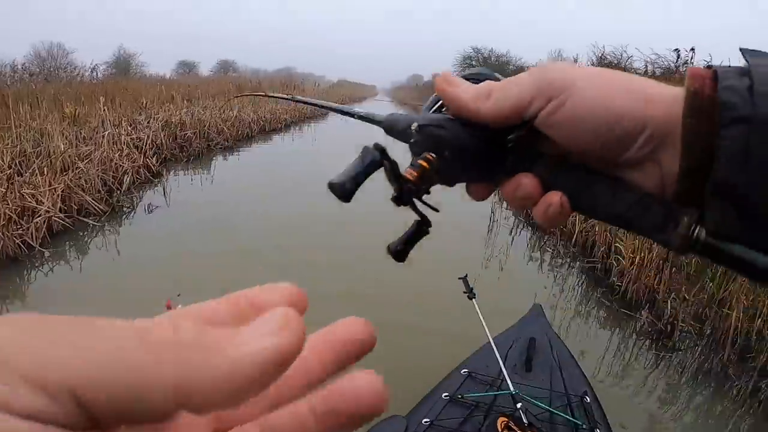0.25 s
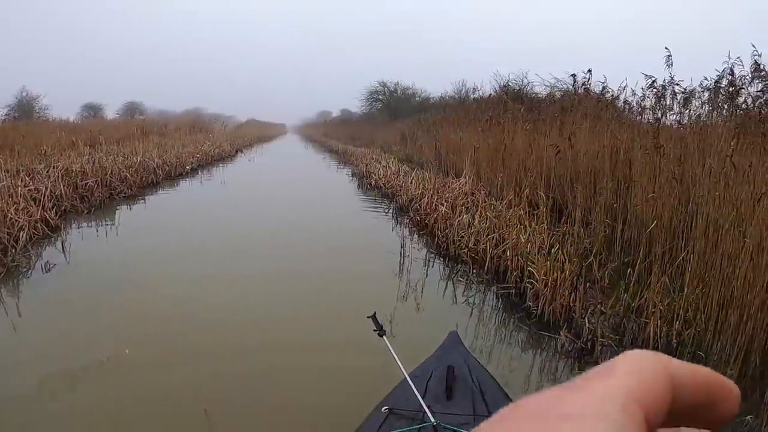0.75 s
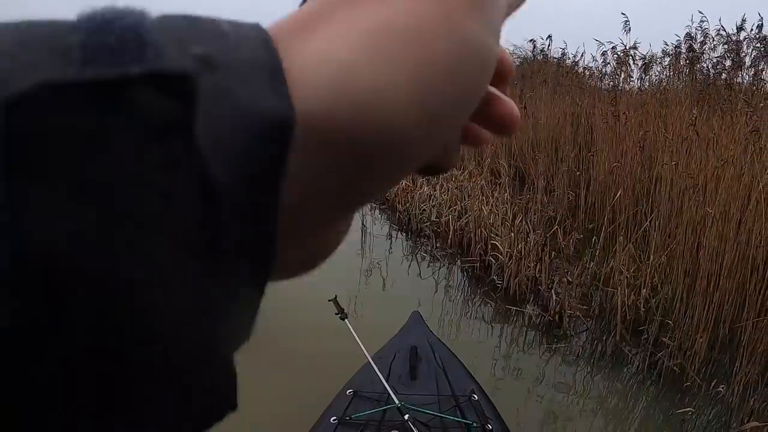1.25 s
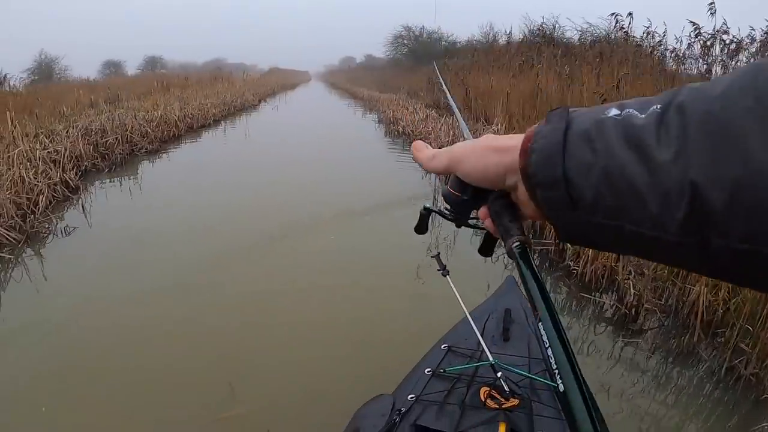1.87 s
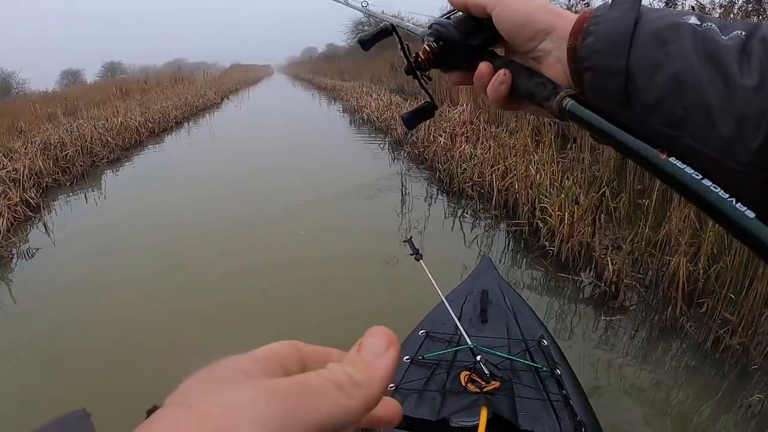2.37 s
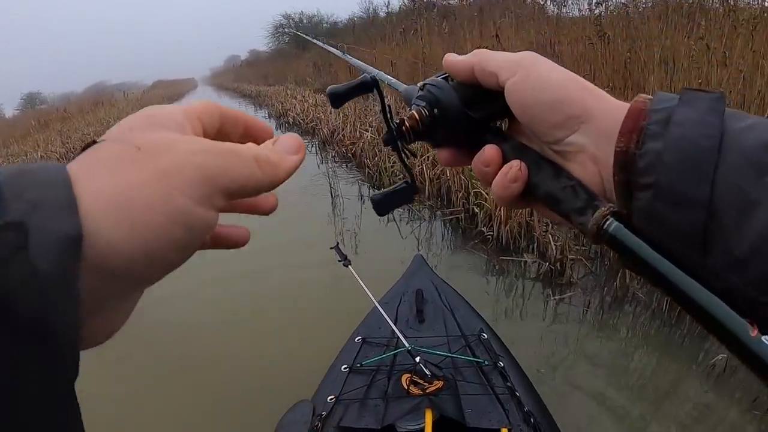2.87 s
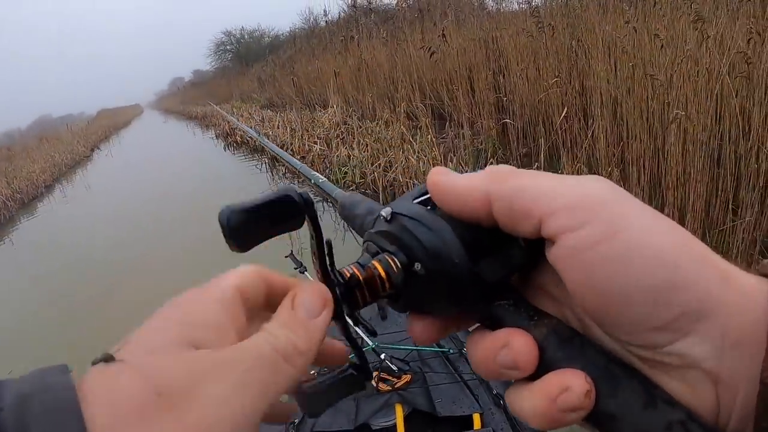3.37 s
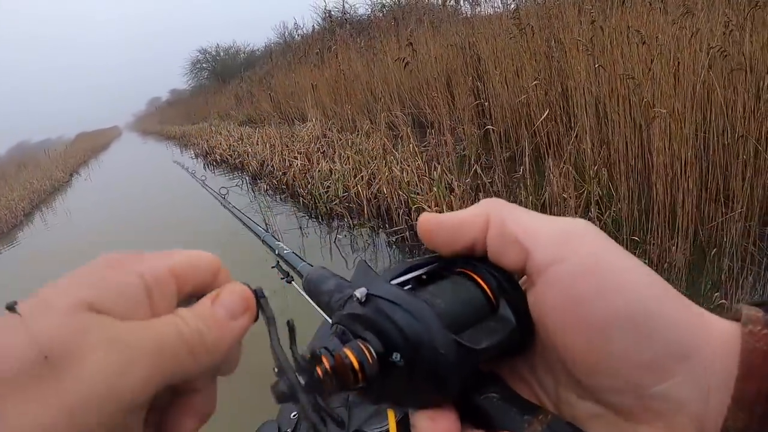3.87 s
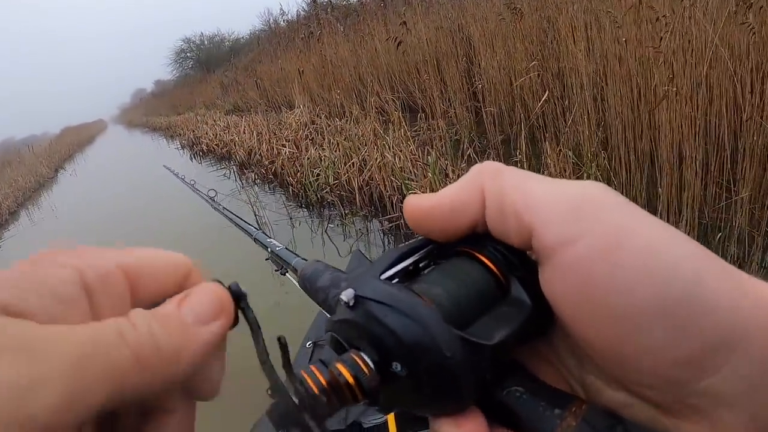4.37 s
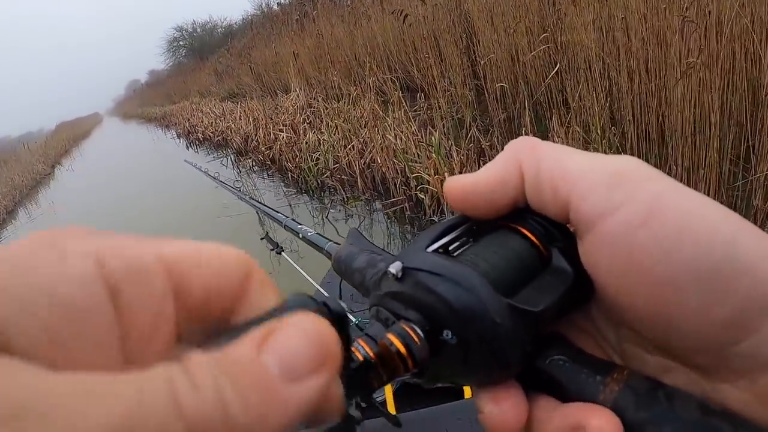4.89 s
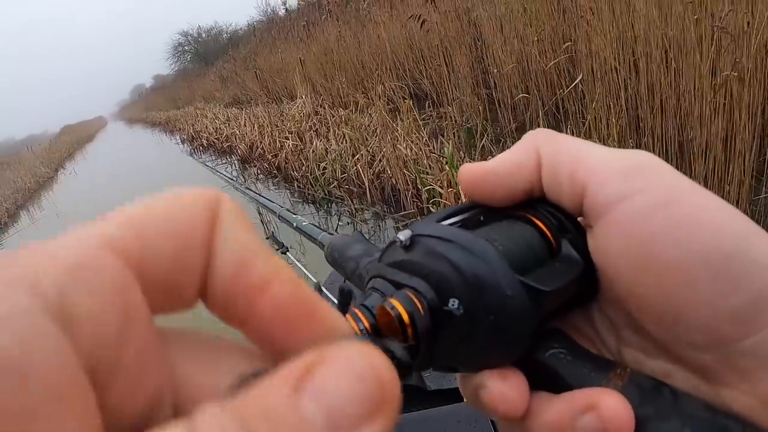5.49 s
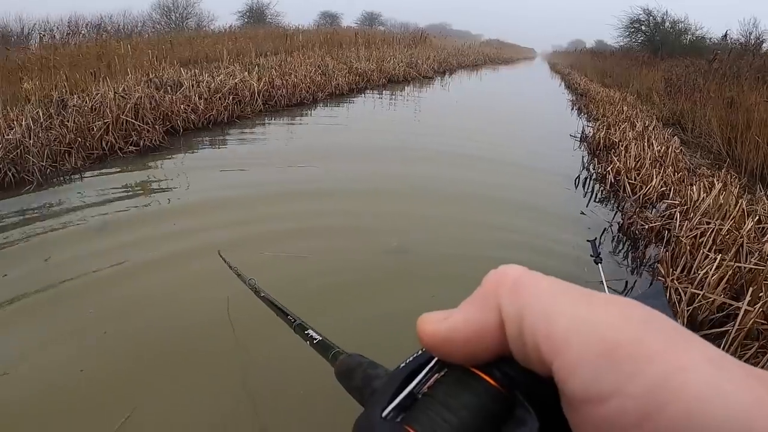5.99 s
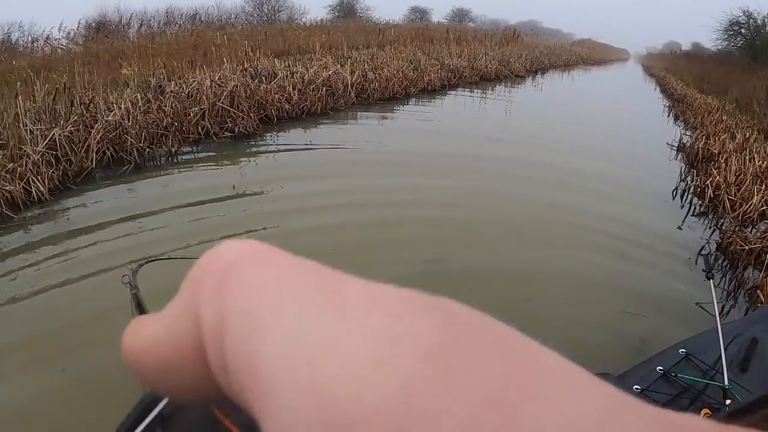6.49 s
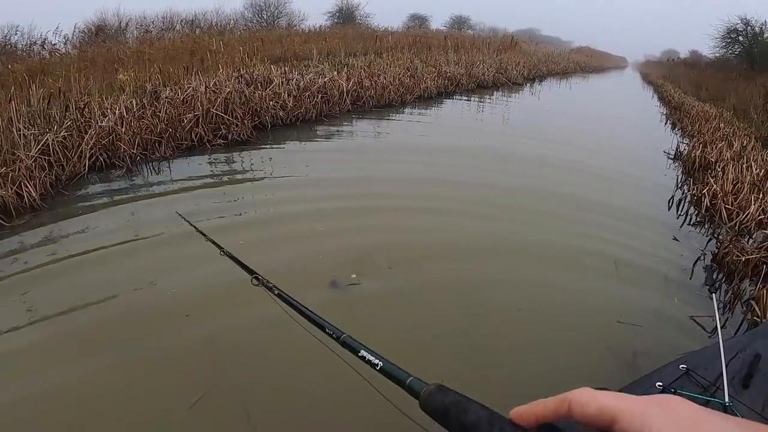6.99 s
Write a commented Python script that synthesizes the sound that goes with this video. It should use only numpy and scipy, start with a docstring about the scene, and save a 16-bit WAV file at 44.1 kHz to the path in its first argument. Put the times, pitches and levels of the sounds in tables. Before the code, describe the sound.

Close sleeve rustle and sharp clicks surround a fishing reel's falling whine, followed by quiet winding and a low gust of wind.

```python
"""A kayak on a reedy channel, a small two-port microphone close to an angler casting a baitcasting reel.
Behind everything lies the faint hiss of open air; puffs of wind swell to a gust and pop on the ports.
Jacket sleeves rustle with each move, and handling draws ticks and ringing knocks from the reel.
In front, the clutch clicks out, the spool whines down as line runs off, the thumb clamps it,
the clutch clicks back in and the gears whirr."""
import sys
import numpy as np
from scipy import signal
from scipy.fft import irfft
from scipy.io import wavfile
from scipy.ndimage import uniform_filter1d

SR = 44100
rng = np.random.default_rng(int(sys.argv[2]) if len(sys.argv) > 2 else 0)


def store_pcm(level_fs):
    """Save levels as 16-bit WAV."""
    pcm = np.round(np.clip(level_fs, -1, 1) * 32767).astype(np.int16)
    wavfile.write(sys.argv[1], SR, np.atleast_2d(pcm).T)


N = 319708

# how the two ports hear the hands, and the jacket and air:
# (frequency [Hz], likeness [0-1], lead of the right port [rad], added L-R [dB])
FROM_HANDS = [(100, 1, 0, 0), (1400, .95, .75, 0), (2800, .95, .75, 0), (4100, .85, 1.15, 1),
              (4900, .6, 2.3, 1), (5700, .65, 2.1, -5), (7200, .6, 2.1, 0), (9000, .5, 2.7, -2),
              (15000, .4, 2.8, -2)]
FROM_JACKET = [(100, .9, 0, -4), (700, .88, .35, -2), (1400, .8, .7, 0), (2800, .65, .5, 1),
               (4100, .65, -1, 0), (5200, .68, -1.55, -5), (7200, .6, -2.2, -2), (9600, .6, -3.1, -6),
               (15000, .6, -3.3, -6)]

# still air over the reeds: (frequency [Hz], relative density [dB])
AIR_SPECTRUM = [(40, -8), (110, -3.5), (200, 0.5), (500, -12.5), (3300, -24), (7600, -19), (9000, -30),
                (15800, -47)]
# wind on the ports, before strength and eddies shift it: (frequency [Hz], relative density [dB])
WIND_SPECTRUM = [(10, -24), (28, -3), (42, 1), (70, 1.5), (150, -7), (300, -16.5), (600, -62), (1500, -59),
                 (4000, -120)]
# puffs: (peak time [s], rise [s], fall [s], relative level [dB], L-R [dB], eddy pitch [Hz])
GUSTS = [(.14, .1, 0.041, -48.5, 9, 64.5), (.38, 0.035, 0.034, -37.5, 5, 81.5),
         (.48, 0.05, 0.11, -38.5, 7.5, 69), (.83, 0.038, 0.019, -36.5, 3, 70.5),
         (.97, 0.077, 0.064, -38, -1, 73), (1.09, 0.067, 0.026, -37.5, 5, 87),
         (1.23, 0.063, 0.025, -44.5, 8, 62), (1.33, 0.024, .2, -46, -4, 68.4),
         (1.55, .1, 0.08, -51, 4, 80.3), (1.755, 0.033, 0.085, -31, 0, 87), (2.49, .05, 0.078, -61, 9, 92),
         (2.75, 0.043, 0.033, -34.5, 3.5, 87.7), (2.85, 0.025, 0.092, -36.5, 12.5, 65.34),
         (3.01, 0.036, 0.035, -44, 0, 67.3), (3.13, 0.036, 0.065, -40, 0, 70),
         (3.28, 0.086, 0.28, -51.5, 5, 75), (3.57, 0.24, 0.09, -45, -0.5, 105),
         (4.06, 0.03, 0.057, -40.5, -12.5, 57.3), (4.5, 0.019, 0.028, -39.5, 3, 58),
         (5.1, 0.22, 0.034, -49.5, 0, 63), (5.5, 0.052, 0.22, -42, 13.5, 62.4),
         (5.81, 0.065, 0.067, -50.5, -15, 58), (6.06, 0.091, 0.084, -45, -9, 62),
         (6.5, 0.047, 0.038, -33, -7.5, 141), (6.61, 0.087, 0.15, -37.5, -3.5, 95),
         (6.85, 0.022, 0.11, -22, 4.5, 62.4), (6.995, 0.023, 0.071, -23, 5, 70.5),
         (7.07, 0.085, 0.076, -19, -8, 68.3), (7.2, 0.19, 0.37, -19.5, 1, 72)]
# breeze between the puffs: (time [s], relative level [dB], L-R [dB], eddy pitch [Hz])
LULL = [(0, -64.5, -6, 165), (2, -63, -9, 165), (7.25, -84, -11, 150)]
# eddies striking a port: (time [s], level [dB], pitch [Hz], L-R [dB])
EDDY_POPS = [(6.927, -30.5, 230, -6), (6.985, -25, 199, -12), (7.029, -19.5, 196, -12),
             (7.073, -20.5, 242, -18), (7.091, -21.5, 240, -18), (7.118, -27, 280, -16),
             (7.137, -18.5, 294, -6.5), (7.187, -27, 220, -11), (7.222, -18.5, 384, -18),
             (7.238, -11, 364, 10)]

# rubbing jacket cloth: (frequency [Hz], relative density [dB])
CLOTH_SPECTRUM = [(50, -30), (170, -10.5), (400, -14.5), (1400, -13.5), (3500, -16.5), (5600, -17),
                  (7600, -17.5), (8800, -28), (12300, -33), (15800, -50)]
# sleeve moves: (peak time [s], rise [s], fall [s], relative level [dB], dull body boost [dB], L-R [dB])
SLEEVE_MOVES = [(.13, 0.092, 0.12, -54.5, 8, 6.5), (.43, 0.1, 0.049, -59.5, 14.5, 5),
                (.64, 0.073, 0.12, -53.5, 2, 5.5), (.72, 0.095, .17, -52.5, 10, 6.5),
                (1.065, 0.025, 0.045, -61, -5, 6), (1.1, 0.084, 0.14, -53.5, -5, 9),
                (1.35, 0.15, 0.17, -57.5, 11.5, 10), (1.65, 0.037, 0.089, -58, 23.5, 8),
                (1.75, 0.016, 0.16, -45.5, 14.5, 3.5), (2.25, 0.098, 0.074, -50.5, 1, 5.5),
                (3.0, 0.18, 0.075, -57.5, 6, -2.5), (3.1, 0.048, 0.068, -55, 3, 0),
                (3.585, 0.03, 0.0076, -49.5, 21, 7), (3.69, 0.077, 0.09, -54.5, 17.5, 7),
                (3.92, 0.1, 0.038, -64.5, 19, 1), (4.2, 0.095, 0.095, -54, -8, 8),
                (4.45, 0.058, 0.11, -69, 26, 2), (4.8, 0.11, 0.13, -55.5, 8, 7.5),
                (5.45, 0.19, 0.15, -54, 5, 7.5), (6.0, 0.12, 0.25, -60, 16, 10),
                (6.51, 0.044, 0.059, -58.5, 27, 3), (6.66, 0.14, .12, -67, 21, 3),
                (6.96, 0.1, 0.13, -68.5, 18, 2)]
# the jacket between moves: (time [s], relative level [dB], dull body boost [dB], L-R [dB])
FIDGET = [(0, -61.5, 30.5, 8), (.3, -65, 23, 4), (1.5, -66, 24, 7), (2.0, -58.5, 16.5, 2),
          (2.7, -63.5, -7, 4), (3.2, -61.5, 19.5, 6), (3.55, -61.5, 15, 8.5), (3.948, -72, 18, 3),
          (4.4, -71.5, 6, 2), (4.95, -66.5, 18.5, 5), (5.25, -64.5, 23, 5.5), (5.65, -71, -7, 8),
          (6.35, -84.5, 1, 20), (7.25, -81.5, 31, 5)]
# strokes in which the weave sings: (start [s], end [s], first pitch [Hz], last pitch [Hz], level [dB])
WEAVE_STROKES = [(0, 0.17, 574, 716, -50), (0.643, 0.787, 418, 209, -42.5), (1.024, 1.237, 230, 970, -50),
                 (1.634, 1.685, 266, 310, -42), (1.74, 1.84, 456, 219, -36.5),
                 (2.208, 2.284, 229, 760, -40), (3.62, 3.78, 420, 503, -44.5),
                 (4.127, 4.254, 745, 487, -48.5), (4.714, 4.838, 490, 510, -49),
                 (5.299, 5.515, 604, 457, -45), (5.938, 6.152, 446, 1270, -51),
                 (6.446, 6.57, 1240, 1050, -43.5), (6.862, 7.096, 3300, 2820, -56),
                 (6.866, 7.08, 1300, 1120, -54.5)]

# hiss of running line and gears: (frequency [Hz], relative density [dB])
GEAR_SPECTRUM = [(500, -61), (850, -5.5), (1050, 6), (2000, 3), (3300, 5.5), (4600, -3), (5800, -6.5),
                 (7500, -22), (9000, -29), (15800, -51)]
# the course of that hiss: (time [s], relative level [dB])
GEAR_LEVEL = [(0.0, -48), (0.4, -44.5), (0.77, -54), (0.87, -58), (1.2, -63), (1.45, -51.5), (1.725, -38),
              (1.745, -35), (1.98, -32), (2.4, -36), (2.56, -36), (2.8, -36), (2.985, -40), (3.005, -27.5),
              (3.03, -37), (3.07, -41), (3.095, -29), (3.115, -31), (3.135, -40), (3.21, -49), (3.78, -53),
              (3.86, -39.5), (3.95, -42.5), (3.99, -47.5), (4.06, -43.5), (4.28, -43.5), (4.34, -49),
              (4.45, -39.5), (4.62, -45.5), (4.7, -47.5), (4.95, -45.5), (5.16, -40.5), (5.22, -44),
              (5.49, -56), (5.67, -45), (5.92, -103), (6.08, -36.5), (6.24, -62), (6.46, -46), (6.6, -43),
              (7.25, -48.5)]
# resonances of the reel's side plates: (frequency [Hz], width [Hz], boost with the spool engaged [dB])
PLATE_RESONANCES = [(1100, 200, 4), (1650, 170, 6), (2570, 110, 9), (3280, 100, 4), (3960, 150, 4)]
# small rings, ticks and soft knocks: (time [s], peak [dB], pitch [Hz], t60 [s], L-R [dB])
HANDLING_TICKS = [(0.837, -28.5, 2500, 0.0085, 2), (0.993, -37, 3520, 0.0085, 2),
                  (1.071, -23, 4300, 0.0051, -2), (4.091, -46, 1170, .008, 2), (4.145, -38, 673, 0.013, 2),
                  (5.075, -40, 436, 0.017, -2), (5.124, -36.5, 466, 0.035, -2),
                  (5.174, -37, 1560, 0.014, 7), (5.615, -17, 2480, 0.0061, 0),
                  (6.316, -47, 1840, 0.0077, 2.5), (6.4427, -34.5, 1130, 0.0079, 1),
                  (6.8325, -29, 4510, 0.011, 4), (0.4125, -34.5, 7100, 0.079, -4),
                  (3.1974, -40, 7100, 0.2, -1), (6.579, -34.5, 2020, 0.025, 1.5),
                  (6.5954, -38, 1960, 0.066, 1.5), (0.224, -39, 910, .008, -8),
                  (.224, -26.5, 300, 0.0085, -1), (.461, -25, 570, 0.026, -2), (.472, -35, 110, 0.028, 0),
                  (.27, -29, 405, 0.0068, -1), (0.3067, -30, 298, 0.006, 0), (1.739, -23, 247, 0.011, 4),
                  (3.003, -23.5, 568, 0.039, -2), (3.078, -30.5, 566, 0.063, -1),
                  (3.087, -27.5, 554, 0.066, -2), (3.59, -24.5, 480, 0.023, -3),
                  (3.6005, -31, 420, 0.035, -3), (0.447, -42, 3730, 0.04, 1),
                  (0.466, -29.5, 1300, 0.038, -1), (3.425, -35.5, 666, 0.037, -2),
                  (6.317, -46, 740, 0.011, -1), (0.945, -43, 7130, 0.055, -5),
                  (3.1974, -48, 10530, 0.12, -5), (1.945, -30, 7470, 0.06, 2),
                  (2.337, -33.5, 225, 0.063, 0), (4.598, -40.5, 296.9, 0.04, 0),
                  (6.546, -23.5, 183, 0.025, -1), (6.569, -34, 202, 0.025, -3.5)]
# ringing modes of the reel: (frequency [Hz], relative level [dB], base t60 [s])
REEL_MODES = [(560, -6, .035), (1050, -1, .02), (1290, -2, .018), (1950, -2, .016), (2450, -6, .014),
              (3150, -6, .012), (3800, 0, .014), (4400, -2, .012), (5700, -10, .008), (6900, -6, .009),
              (8000, -10, .008), (9800, -20, .007), (13000, -26, .006)]
# blows on the reel:
# (time [s], peak [dB], frequency struck most [Hz], ring length [factor], crack over ring [dB], L-R [dB])
REEL_BLOWS = [(0.4577, -4.5, 3400, 0.6, -8, -1), (0.4583, -15, 2070, 0.49, -12, -5),
              (.459, -16, 3700, .35, -16, -3), (0.463, -27, 3500, .5, -8, 0),
              (1.7395, -24, 2000, .4, -2, 11), (1.804, -21, 1040, .8, -4, 2),
              (1.794, -18.5, 3150, 0.9, -16, -6), (3.001, -32, 2300, 0.7, 0, -9),
              (3.007, -17.5, 2232, 1.1, -4, -5), (3.013, -21.5, 2400, 0.4, 18, -7),
              (3.086, -27, 1980, 0.61, -8, -1), (3.094, -16, 2060, 0.69, -10, -3),
              (3.098, -18, 2090, 1, -18, -11), (3.106, -25, 1940, 1.5, -5, -11),
              (3.11, -30, 3000, 0.7, 0, -4), (3.119, -33, 1600, 0.7, 2, -6),
              (3.5709, -13, 2370, 0.19, 1, -5), (3.5741, -8.5, 2050, 0.9, -1, -4),
              (3.579, -10, 4300, 0.48, -7, -8), (3.5789, -9.5, 2010, 0.55, 1, -6),
              (3.582, -11, 4340, 0.77, -6, -2), (3.5887, -20, 1930, 0.85, 1, -6),
              (4.108, -37, 1820, 0.5, -4, 6), (4.88, -33, 3800, 0.4, -3, 2), (4.979, -39, 1690, 0.6, 4, 4),
              (4.658, -38, 1870, .5, 0, 1.5), (5.231, -43, 1630, .5, 0, 5),
              (5.0365, -38, 1780, 0.6, 0, 2.5), (5.1166, -36, 2400, 0.5, 3, 0),
              (5.178, -40, 2000, 0.5, 1, 2), (6.467, -24, 1160, 0.34, 2, -1),
              (6.478, -30, 1065, 0.69, -7, -1.5), (6.486, -26, 1200, 0.41, 0, -3),
              (6.493, -15.5, 895, 0.41, -19, -1), (6.498, -17.5, 1100, 0.51, -3, -1),
              (6.506, -15.5, 1030, 0.4, 0, -4), (6.511, -20, 1260, 0.19, -5, 2),
              (6.516, -21, 1040, 0.81, 6, -4), (6.523, -24, 918, 0.51, -1, -4),
              (6.538, -24.5, 1110, 0.58, 9, -3)]

# speed of the free spool, heard as its whine: (time [s], pitch [Hz], L-R [dB])
SPOOL_WHINE = [(1.79, 1576, 10), (1.824, 1614, 5), (1.83, 2045, -4), (1.845, 2518, -12), (1.86, 2770, 0),
               (1.885, 2877, 0), (1.94, 2740, -1), (1.975, 2668, -2), (2.033, 2479, -1), (2.123, 2370, -2),
               (2.15, 2301, -3), (2.203, 2320, -5), (2.257, 2172, -8), (2.31, 2132, -6), (2.383, 2073, -10),
               (2.392, 1975, -11), (2.431, 1872, -4), (2.52, 1814, -4), (2.56, 1735, -5), (2.613, 1675, -3),
               (2.641, 1680, -3), (2.693, 1611, -1), (2.731, 1512, 0), (2.803, 1460, 0), (2.901, 1356, -1),
               (2.929, 1287, -1), (3.0, 1239, 0), (3.012, 1129, -2), (3.026, 948, -1), (3.036, 992, 2),
               (3.06, 934, -1), (3.095, 864, -5)]
# how strongly the reel sounds a harmonic at each pitch: (frequency [Hz], level [dB])
REEL_RESPONSE = [(900, -60), (1240, -42), (1400, -38.5), (1660, -37), (1900, -35.5), (2130, -34),
                 (2300, -34), (2450, -34), (2850, -31.5), (3350, -42.5), (3700, -33), (3960, -36),
                 (4080, -42.5), (4260, -34), (4500, -36), (5100, -38.5), (5550, -34), (5900, -30.5),
                 (6350, -40), (6900, -53), (8600, -75)]
# harmonics 1 to 4 of the whine: (relative level [dB])
HARMONICS_DB = [-1, -4.5, -11, -14]
# the fundamental swells and sags: (time [s], level change [dB])
WHINE_WAVER = [(1.83, -25), (1.845, 0), (1.93, 0), (1.972, -1.5), (2.0, 2.5), (2.033, -4.5), (2.09, -1.5),
               (2.123, -1.5), (2.15, 0), (2.2, -1.5), (2.39, -2), (2.43, 1.5), (2.48, -0.5), (2.55, 2.5),
               (2.63, -1), (2.69, 2), (2.73, -3), (2.85, 1.5), (2.93, -3), (3.0, 2), (3.026, -5), (3.04, 0)]
# sidebands from uneven turning: (offset [turn rates], level against the harmonic at a 2 kHz whine [dB])
SIDEBANDS = [(-2, -16), (-1, -14), (1, -15), (2, -12)]
# once-a-turn hum of the unbalanced spool: (time [s], level [dB])
UNBALANCE_HUM = [(1.85, -56), (1.9, -50), (2.08, -50), (2.13, -45), (2.16, -60), (2.36, -58), (2.4, -49),
                 (2.46, -55), (2.5, -70)]
# the thumb clamps the spool, harmonics 1 to 4: (level change [dB])
CLAMP_DB = [-3, -4.5, 3.5, -5]

FREE_S, THUMB_S, CLAMP_S, STOP_S = SPOOL_WHINE[0][0], 2.9, 3.015, SPOOL_WHINE[-1][0]
CYCLES_PER_TURN = 13


def gain_of(db):
    return 10 ** (np.asarray(db) / 20)


def at_hz(points, hz):
    """A curve read along a logarithmic frequency axis."""
    f, value = np.transpose(points)
    return np.interp(np.log(hz + 1), np.log(f + 1), value)


def at_times(rows, t):
    """Every column of a curve at the times t."""
    times, *cols = np.transpose(rows)
    return [np.interp(t, times, col) for col in cols]


def band_gain(points, hz, lo, hi):
    """A spectrum scaled so that white noise of rms 1 gets rms 1 between lo and hi."""
    gain = gain_of(at_hz(points, hz))
    return (gain / np.sqrt(np.mean(gain ** 2 * (hz > lo) * (hz < hi))))[:, None]


def resonance(hz, centre_hz, width_hz):
    """A peak of height 1, as a column over frequency."""
    return 1 / (1 + (2 * (hz[:, None] - centre_hz) / width_hz) ** 2)


def swells(rows, rest, t, shape):
    """Events 10 dB down at their rise and fall times, over a resting curve; the loudest sets the rest."""
    peak_s, rise, fall, db, *cols = np.transpose(rows)[:, :, None]
    away = np.where(t < peak_s, (peak_s - t) / rise, (t - peak_s) / fall)
    rest_db, *rest_cols = at_times(rest, t)
    power, quiet = gain_of(db - 10 * away ** shape) ** 2, gain_of(rest_db) ** 2
    total = power.sum(0) + quiet
    blended = [((power * col).sum(0) + quiet * resting) / total for col, resting in zip(cols, rest_cols)]
    return [10 * np.log10(total)] + blended


def wander(hz, t):
    """Random drift of rms 1, changing up to hz times a second."""
    knots = np.arange(t[0] - 1 / hz, t[-1] + 2 / hz, .5 / hz)
    return np.interp(t, knots, rng.standard_normal(len(knots))) * np.sqrt(1.5)


def patches(shape, bins, steps):
    """Random blotches of rms 1 over frequency and time."""
    field = uniform_filter1d(rng.standard_normal(shape), bins, axis=0)
    field = uniform_filter1d(field, steps, axis=1)
    return field / field.std()


def grains(per_s, spread_db):
    """Two unrelated trains of tiny clicks of uneven size, each of rms 1."""
    size = gain_of(spread_db * np.minimum(rng.exponential(1, (2, N)), 5)) * rng.standard_normal((2, N))
    clicks = size * (rng.random((2, N)) < per_s / SR)
    return clicks / np.sqrt(np.mean(clicks ** 2, axis=-1, keepdims=True) + 1e-20)


def frames(x, size=512):
    return signal.stft(x, SR, nperseg=size, noverlap=size * 3 // 4)


def unframe(spectra, size=512):
    return signal.istft(spectra, SR, nperseg=size, noverlap=size * 3 // 4)[1][..., :N]


def panned(x, pan_db):
    return np.array([x * gain_of(pan_db / 2), x * gain_of(-pan_db / 2)])


def add(mix, start_s, sound):
    part = mix[:, round(start_s * SR):][:, :sound.shape[1]]
    part += sound[:, :part.shape[1]]


def port_response(place, hz):
    """Likeness, phase and balance of the microphone's ports at each frequency."""
    f, *cols = np.transpose(place)
    return [at_hz(np.transpose([f, col]), hz) for col in cols]


def at_ports(hz, spectra, pan_db, place):
    """Two unrelated spectra as left and right: the ports differ in level and phase, and agree in part."""
    left, other = spectra
    likeness, lead, balance_db = port_response(place, hz[:, None])
    right = (likeness * left + np.sqrt(1 - likeness ** 2) * other) * np.exp(1j * lead)
    lean = gain_of((pan_db + balance_db) / 2)
    return np.array([left * lean, right / lean])


def hands_to_microphone(x):
    """Things in the hands reach the right port first; a reflection off the angler makes the ports differ."""
    hz, echo_s = np.fft.rfftfreq(512, 1 / SR), 0.000602
    likeness, lead, balance_db = port_response(FROM_HANDS, hz)
    echo = 0.51 * np.sqrt(1 - likeness ** 2) * np.exp(-2j * np.pi * hz * echo_s)
    paths = [gain_of(balance_db / 2), (1 + echo) * np.exp(1j * lead) * gain_of(-balance_db / 2)]
    impulses = np.roll(irfft(paths), 256, axis=1)
    return signal.oaconvolve(x, impulses, axes=1)[:, 256:N + 256]


def open_air(level_db=-59.5):
    """The faint, steady hiss of the air over the reeds."""
    hz, _, noise = frames(rng.standard_normal((2, N)))
    colour = band_gain(AIR_SPECTRUM, hz, 0, SR) * gain_of(level_db)
    return unframe(at_ports(hz, noise * colour, pan_db=1.3, place=FROM_JACKET))


def wind():
    """Lumpy pressure puffs, unrelated at the two ports; stronger wind reaches higher in pitch."""
    hz, t, lumps = frames(grains(per_s=300, spread_db=1), size=2048)
    level_db, pan_db, eddy_hz = swells(GUSTS, LULL, t, shape=1.26)
    reach = gain_of(0.18 * (level_db + 16.5)) * (eddy_hz / 65) ** 1.71
    colour = gain_of(at_hz(WIND_SPECTRUM, hz[:, None] / reach))
    puffs = unframe(lumps * colour / np.sqrt(np.mean(colour ** 2, axis=0)), size=2048)
    puffs /= np.sqrt(uniform_filter1d(puffs ** 2, 4000)) ** 0.2 + 0.5  # neighbouring eddies share the flow
    puffs = 2.5 * np.tanh(puffs / 2.5)
    level_db, pan_db = (np.interp(np.arange(N) / SR, t, curve) for curve in (level_db, pan_db))
    return puffs * gain_of(level_db + 6 + np.array([pan_db, -pan_db]) / 2)


def eddy_pops():
    """In the gust, eddies give a port blunt pushes of about one cycle."""
    mix = np.zeros((2, N))
    for centre_s, db, hz, pan_db in EDDY_POPS:
        cycles = np.arange(-1.5, 1.5, hz / SR)
        push = np.exp(-(cycles / 0.37) ** 2) * np.cos(2 * np.pi * cycles + 1.1)
        add(mix, centre_s - 1.5 / hz, panned(gain_of(db) * push, pan_db))
    return mix


def sleeve_rustle():
    """Fibres catch and slip; the weave adds a blurred tone that follows the speed of the stroke."""
    hz, t, slips = frames(grains(per_s=9000, spread_db=0.69))
    level_db, body_db, pan_db = swells(SLEEVE_MOVES, FIDGET, t, shape=2.6)
    body = gain_of(body_db + 1) / (1 + ((hz[:, None] - 480) / 300) ** 4)
    colour = np.hypot(band_gain(CLOTH_SPECTRUM, hz, 6275, 7550), body)
    colour *= gain_of(level_db + 4 + 1.7 * patches(colour.shape, bins=6, steps=14))
    for start_s, end_s, from_hz, to_hz, db in WEAVE_STROKES:
        now = (t > start_s) & (t < end_s)
        progress = (t[now] - start_s) / (end_s - start_s)
        weave_hz = from_hz + (to_hz - from_hz) * progress
        width_hz = 0.2 * weave_hz
        weave = np.sin(np.pi * progress) ** .5 * resonance(hz, weave_hz, width_hz)
        colour[:, now] = np.hypot(colour[:, now], gain_of(db) * np.sqrt(SR / width_hz) * weave)
    return unframe(at_ports(hz, slips * colour, pan_db, FROM_JACKET))


def noise_band(hz, centre_hz, width_hz):
    """A resonance scaled so that its power hardly depends on its width."""
    return np.sqrt(SR / 2 / width_hz) * resonance(hz, centre_hz, width_hz)


def running_reel():
    """Line and gears hiss between ringing plates; bearings rasp in the cast, gears whirr on cranking."""
    hz, t, noise = frames(rng.standard_normal((2, N)))
    free = uniform_filter1d(((t > FREE_S) & (t < STOP_S + .02)) * 1., size=15)  # 1 while the spool is free
    plates_db = sum(db * resonance(hz, f, width) for f, width, db in PLATE_RESONANCES)
    octaves_up = np.maximum(np.log2((hz[:, None] + 1) / 2000), 0)
    db_per_octave = -12 * (1 - free) + free * (4 + 2.5 * (t - FREE_S))  # brightens as the spool runs on
    colour_db = (1 - 1.4 * free) * plates_db + db_per_octave * octaves_up
    hiss = band_gain(GEAR_SPECTRUM, hz, 980, 5400) * gain_of(colour_db)
    rasp = free * gain_of(-4 + 2.9 * wander(6.6, t)) * noise_band(hz, 5750, width_hz=450)
    level_db, = at_times(GEAR_LEVEL, t)
    flicker_db = 1.8 * patches(hiss.shape, bins=5, steps=16) + 1.2 * wander(25, t)
    running = np.hypot(hiss, rasp) * gain_of(level_db - 8 + flicker_db)
    cranking = (t > 4.65) & (t < 5.25)
    whirr = cranking * gain_of(-64) * noise_band(hz, 3290, width_hz=60)
    return unframe(at_ports(hz, noise * np.hypot(running, whirr), pan_db=-1, place=FROM_HANDS))


def handling_ticks():
    """One damped ring each, rising over a moment, its pitch dropping at the first contact."""
    mix, t = np.zeros((2, N)), np.arange(6000) / SR
    for start_s, db, hz, t60, pan_db in HANDLING_TICKS:
        slowness = 2500 / hz  # lower rings start more gently
        bend = 1.54 * slowness ** 0.5 * (1 - np.exp(-t / (0.0001 * slowness ** 0.33)))
        attack = 1 - np.exp(-t / (0.00016 * slowness ** .7))
        ring = -attack * gain_of(-60 * t / t60) * np.sin(2 * np.pi * hz * t + bend)
        add(mix, start_s, panned(gain_of(db) * ring / abs(ring).max(), pan_db))
    return mix


def reel_blows(crack_t60=0.013):
    """Clutch clicks and knocks: a dry crack rings the reel's modes, most of all near the pitch struck."""
    mix, t = np.zeros((2, N)), np.arange(1200) / SR
    hz, mode_db, t60 = np.transpose(REEL_MODES)[:, :, None]
    polarity = (-1.) ** np.arange(len(hz))[:, None]  # neighbouring modes swing in opposite sense
    detunes = 1 + 0.068 * (rng.random((len(REEL_BLOWS), len(hz), 1)) - .5)
    noises = rng.standard_normal((len(REEL_BLOWS), len(t)))
    attack = 1 - np.exp(-t / .0004)
    for blow, detune, noise in zip(REEL_BLOWS, detunes, noises):
        start_s, db, struck_hz, ring_length, crack_db, pan_db = blow
        octaves_off = np.log2(hz / struck_hz)
        drive_db = -13 * abs(octaves_off) - 9.2 * np.maximum(-octaves_off, 0)
        decay = gain_of(mode_db + drive_db - 60 * t / (t60 * max(ring_length, .2)))
        ring = (polarity * decay * np.sin(2 * np.pi * hz * detune * t)).sum(0)
        crack_band = signal.butter(2, [0.73 * struck_hz, 2.7 * struck_hz], 'band', fs=SR)
        crack = gain_of(crack_db - 60 * t / crack_t60) * signal.lfilter(*crack_band, noise)
        sound = attack * (ring / abs(ring).max() + crack)
        add(mix, start_s, panned(gain_of(db) * sound / abs(sound).max(), pan_db))
    return mix


def whine_levels(hz, t):
    """Level in dB of each harmonic as it slides through the reel's response and the thumb clamps."""
    levels = [db + at_hz(REEL_RESPONSE, k * hz) + clamp_db * (t > CLAMP_S)
              for k, (db, clamp_db) in enumerate(zip(HARMONICS_DB, CLAMP_DB), 1)]
    levels[0] += at_times(WHINE_WAVER, t)[0]
    levels[1] += 4 * np.clip((1.85 - t) / 0.014, 0, 1)  # spinning up, the octave squeals
    levels[1] -= 13 * np.clip(np.minimum(t - 1.94, 2.29 - t) / 0.022, 0, 1)  # then drops out for a while
    return levels


def spool():
    """The free spool whines, with sidebands from uneven turning; unbalance hums, the thumb buzzes."""
    t = np.arange(FREE_S, STOP_S, 1 / SR)
    hz, pan_db = at_times(SPOOL_WHINE, t)
    wavering_hz = hz * (1 + .003 * wander(90, t) + .002 * wander(18, t))
    angle = 2 * np.pi * np.cumsum(wavering_hz) / SR / CYCLES_PER_TURN
    hum_db, = at_times(UNBALANCE_HUM, t)
    hum = gain_of(hum_db + 3 * wander(25, t)) * np.sin(angle + .6 * wander(30, t))
    buzz_db = -57.5 + 170 * np.minimum(t - THUMB_S, 0)  # rises until the thumb is braking
    buzz = sum(gain_of(buzz_db + 4.66 * wander(29.75, t)) * np.sin(k * angle) for k in range(3, 7))
    speed_db = 3.5 * np.log2(hz / 2000)  # sidebands grow with speed
    whine = np.zeros(len(t))
    for k, db in enumerate(whine_levels(hz, t), 1):
        # higher harmonics and the clamped spool jitter more
        jitter = (.25 * (k - .4) + .5 * (t > CLAMP_S)) * wander(300, t)
        phase = k * CYCLES_PER_TURN * angle + jitter
        harmonic = np.sin(phase)
        for offset, side_db in SIDEBANDS:
            side_gain = gain_of(side_db + speed_db + 0.65 * wander(31.5, t))
            harmonic += side_gain * np.sin(phase + offset * (angle + 1))
        whine += gain_of(db + 1.64 * wander(118.2, t) + .4 * k * wander(22.01, t)) * harmonic
    sound = np.sqrt(2) * (hum + buzz + whine) * signal.windows.tukey(len(t), .015)
    mix = np.zeros((2, N))
    add(mix, FREE_S, panned(sound, pan_db))
    return mix


def scene():
    """Reel and angler close to the microphone, with the air and wind of the channel around them."""
    in_hands = hands_to_microphone(spool() + reel_blows() + handling_ticks())
    return in_hands + sleeve_rustle() + open_air() + running_reel() + wind() + eddy_pops()


def record(dry):
    """The recorder's band limit and a short fade at the end."""
    edge_hz = 15750
    fade = np.minimum(np.arange(N)[::-1] / 150, 1)
    lowpass = signal.firwin(511, edge_hz, window=("kaiser", 9), fs=SR)
    return signal.oaconvolve(dry * fade, lowpass[None], "same")


dry = scene()
out = record(dry)
store_pcm(out)
```